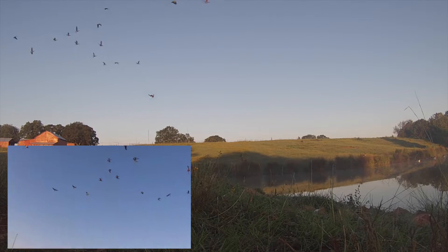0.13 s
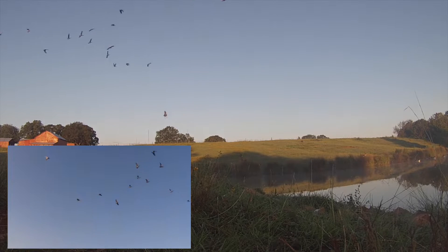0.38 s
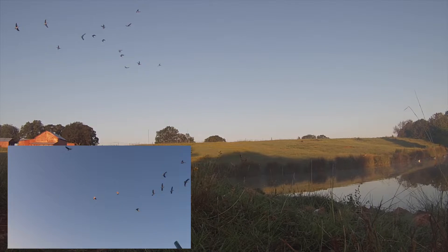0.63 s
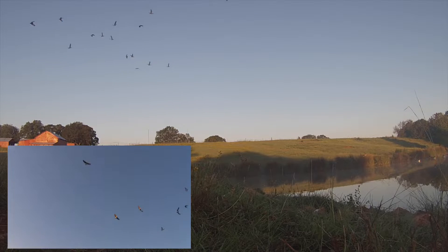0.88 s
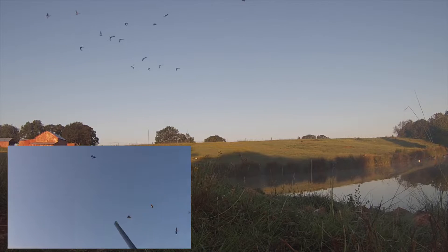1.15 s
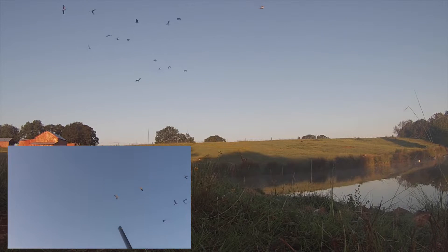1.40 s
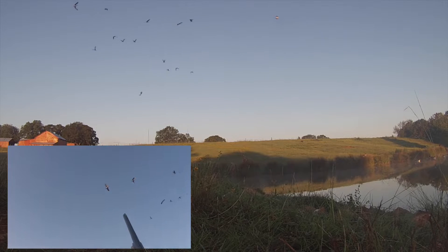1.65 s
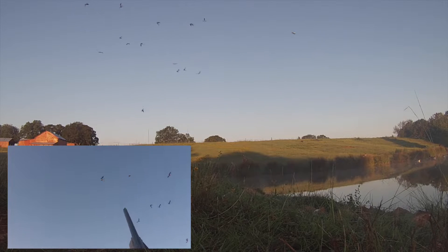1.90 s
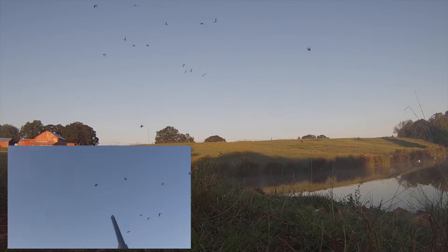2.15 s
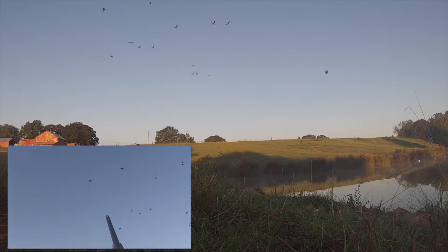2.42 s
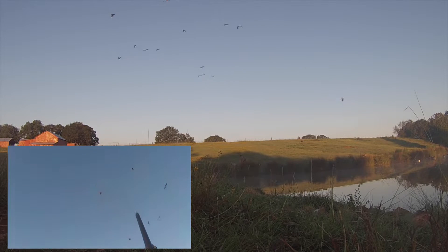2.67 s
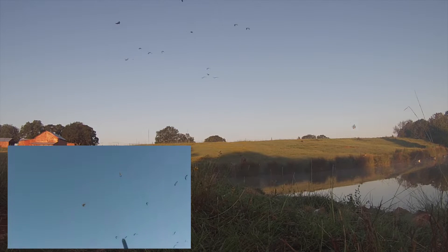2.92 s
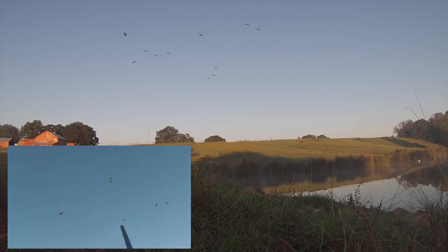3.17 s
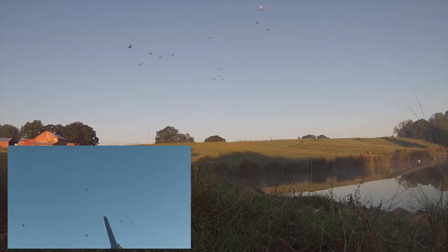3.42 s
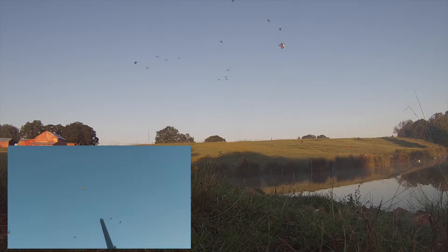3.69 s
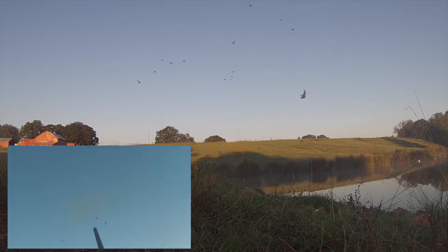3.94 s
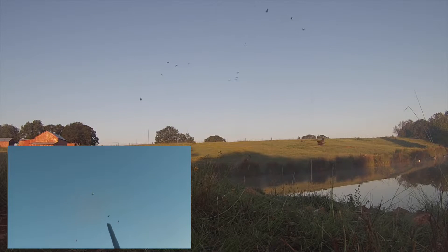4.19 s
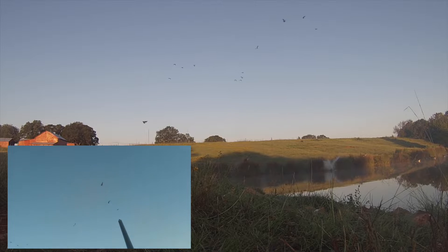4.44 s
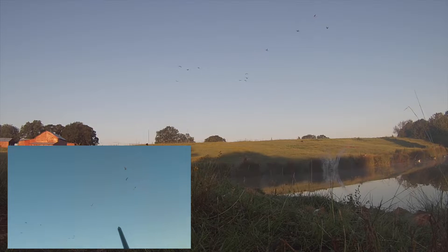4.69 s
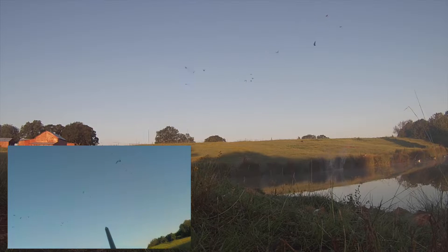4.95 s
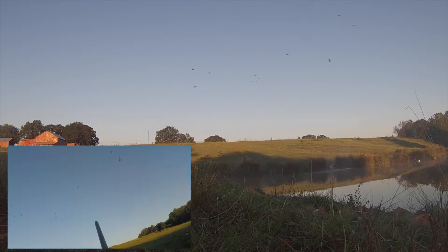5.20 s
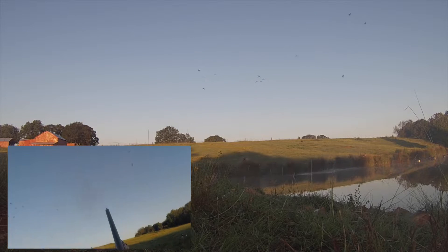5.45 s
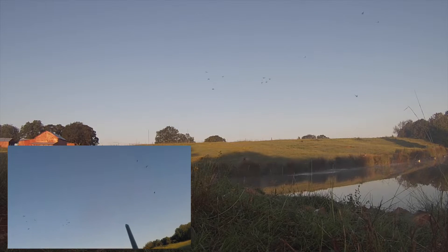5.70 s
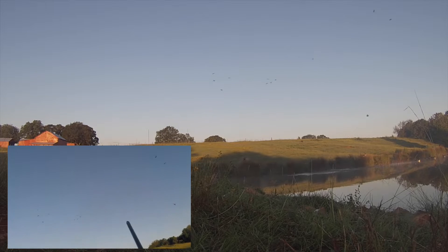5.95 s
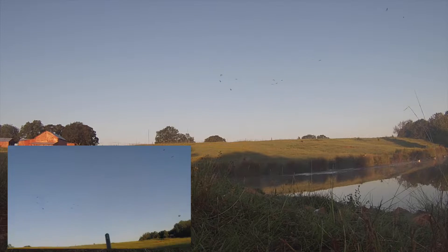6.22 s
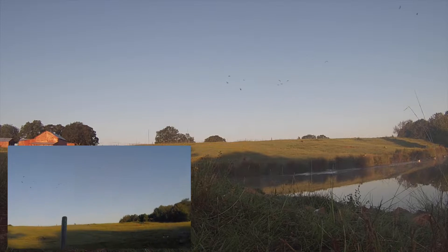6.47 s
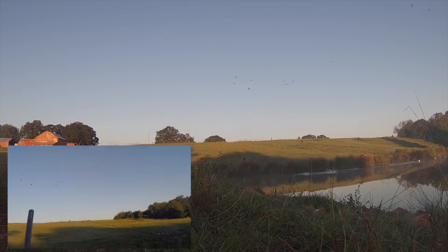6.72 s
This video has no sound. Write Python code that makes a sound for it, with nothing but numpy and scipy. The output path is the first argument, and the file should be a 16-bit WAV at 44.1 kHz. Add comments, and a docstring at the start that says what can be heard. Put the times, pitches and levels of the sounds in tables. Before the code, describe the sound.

A small sealed microphone worn by a shooter at an open pond picks up soft humming knocks, low body rumble, faint hiss and blurred distant geese. After a clack at 0.24 s, two loud blasts hit at 0.34 and 0.5, a weaker one at 0.68, another at 1.06, then 1.75 and an almost doubled pair near 2.05. Each is a clipped, boxy noise burst ringing the case, with a short field echo. A close shot at 2.58 brings a heavy jolt, then bright clacks and sliding action until 3.15. More blasts come at 3.3, 3.7 and 3.83. Gun parts rattle sharply around 4.3-4.55 with thin steel ringing. Scattered nasal honks begin near 3.6, clearer at 5.0. The last shot slams at 5.38 with a deep thump. Hiss and small ticks remain, and two strong honks close at 6.56 and 6.76.

```python
"""Shooters fire at geese over a pond, heard by a small sealed camera worn by one of them.
Soft knocks on the camera's springy mount and clacks of gun parts come first, over rumble and a steady
field hiss with a faint far flock. Then a ragged volley of noise bursts rings the case and overloads
the input, with field echoes and low jolts; between the shots actions slide, tick and ring.
Later a few near geese honk as gliding stacks of harmonics, and go on after the last shot."""
import sys
import numpy as np
from scipy import signal
from scipy.fft import rfft, irfft, next_fast_len
from scipy.io import wavfile
from scipy.ndimage import uniform_filter1d

SR = 44100
rng = np.random.default_rng(int(sys.argv[2]) if len(sys.argv) > 2 else 0)


def materialize(psi):
    """Save the field psi as 16-bit PCM at rate SR to the path in sys.argv[1].

    A 1-D psi becomes a single channel; in a 2-D psi each row is a channel.
    """
    bounded = np.clip(np.atleast_2d(psi).T, -1, 1)
    quanta = np.round(bounded * 32767).astype(np.int16)
    wavfile.write(sys.argv[1], SR, quanta)


def gain_from_db(level_db):
    """Convert decibel levels to linear amplitude factors (20 dB per decade)."""
    decades = np.asarray(level_db, float) / 20
    return 10 ** decades


N = 302082  # length in samples

# gunshots: time_s, level_db, ring_hz, bass_db, treble_db, field echo_db (next to the blast)
GUNSHOTS = [(0.337, 2.5, 2310, -3, -3, -5), (0.494, 3, 1766, -3, -8.5, -11),
            (0.681, -12, 2557, -5, -7.5, -5), (1.06, -1, 1900, -4, -3.5, -7),
            (1.75, -3, 2620, -2, -4.5, -0.5), (2.037, -1.5, 2034, 5, -7, -16),
            (2.07, -1.5, 2393, -1, 2, -10), (2.58, 1.5, 2070, -11, -1, -12),
            (3.29, 2.5, 1594, -5, -1, -9.5), (3.708, -6, 2490, -3, 0, -1.5),
            (3.832, -0.5, 2330, -16, 1, -14.5), (5.377, 3, 2176, -2, 1, -7)]
# loudness of the field over time: time_s, hiss_db
FIELD_LEVEL = [(0.0, -56.5), (0.42, -63), (0.72, -62.5), (1.6, -64), (1.93, -56), (2.29, -66.5),
               (2.94, -61), (3.64, -66), (3.83, -66), (4.92, -64.5), (5.34, -62), (5.63, -72), (5.8, -67.5),
               (6.4, -65), (6.85, -57.5)]


def shape(points, hz):
    """Gain at the given frequencies, read from a tone curve of (Hz, dB) points."""
    point_hz, point_db = np.transpose(points)
    return gain_from_db(np.interp(np.log(np.maximum(hz, 1)), np.log(point_hz), point_db))


def peak(hz, centre_hz, width_hz, db):
    """Power of one resonance: strongest at its centre, halved half a width away."""
    return gain_from_db(db) ** 2 / (1 + (2 * (hz - centre_hz) / width_hz) ** 2)


def case(x, bass_db=0., treble_db=0., ring=(2000, 200, -40)):
    """The sealed case dulls sound through its wall and rings at its cavity modes; tilted per source."""
    # sound through the case wall: pitch_hz, level_db
    wall = [(100, -15), (400, -11.5), (800, -12), (2000, -8), (3100, -21), (5300, -14.5), (9000, -20),
            (13000, -29.5), (15500, -42.5)]
    # resonances of the air inside: centre_hz, width_hz, level_db
    modes = [(447, 35, 0.5), (1188, 120, -5.5), (1548, 110, 2.5), (2040, 450, 1.5), (2580, 220, 3),
             (3550, 300, -10), (4115, 580, -3.5)]
    size = 4096  # samples
    hz = np.arange(size // 2 + 1) * SR / size
    power = shape(wall, hz) ** 2 + sum(peak(hz, *mode) for mode in modes) + peak(hz, *ring)
    tilt = [(600, bass_db), (1000, 0), (2700, 0), (4300, 0.64 * treble_db), (6500, treble_db)]
    gain = np.sqrt(power) * shape(tilt, hz)
    # folding the cepstrum gives a response that starts at once, with nothing before the sound
    cepstrum = irfft(np.log(gain))
    cepstrum[1:size // 2] *= 2
    cepstrum[size // 2 + 1:] = 0
    response = irfft(np.exp(rfft(cepstrum)))[:size // 2]
    response = response / np.sqrt(np.sum(response ** 2))  # power gain 1 for white noise
    return signal.fftconvolve(x, response)[:len(x)]


def add(out, start_s, x):
    """Mix x into out from a given time."""
    i = int(start_s * SR)
    out[i:i + len(x)] += x[:N - i]


def curve(table, column):
    """One table column drawn as a line through every sample."""
    rows = np.array(table)
    return np.interp(np.arange(N) / SR, rows[:, 0], rows[:, column])


def walk(rate_hz):
    """Slow random wander: levels held for one step of the rate, then smoothed twice."""
    k = int(SR / rate_hz)
    steps = np.repeat(rng.standard_normal(N // k + 1), k)
    return uniform_filter1d(uniform_filter1d(steps, k), k)[:N]


def unit(x):
    """Scale to an rms level of 1."""
    return x / np.sqrt(np.mean(x ** 2))


def shots():
    """A few ms of blast and ground bounce shake the case; patchy echoes roll back from the field."""
    # two stages of echo decay: t60_s (time to fall 60 dB), level_db
    echo_stages = [(0.051, -0.5), (.22, -20.5)]
    burst_ms = 4.8  # the burst has halved by then
    echo_bass_db, echo_treble_db = 11, 4  # above the blast's
    out, t = np.zeros(N), np.arange(int(.5 * SR)) / SR
    for time_s, db, ring_hz, bass_db, treble_db, echo_db in GUNSHOTS:
        burst = np.minimum(t / 0.0005, 1) / (1 + (1000 * t / burst_ms) ** 2.6)
        blast = case(burst * rng.standard_normal(len(t)), bass_db, treble_db, ring=(ring_hz, 250, 11))
        patches = np.repeat(rng.standard_normal(len(t) // 350 + 1), 350)[:len(t)]
        patchy = gain_from_db(3 * uniform_filter1d(patches, 100))
        fade = sum(gain_from_db(stage_db - 60 * t / t60_s) for t60_s, stage_db in echo_stages)
        fade = fade * np.minimum(t / 0.0018, 1)
        echo = case(patchy * fade * rng.standard_normal(len(t)),
                    bass_db + echo_bass_db, treble_db + echo_treble_db, ring=(1870, 60, 8))
        add(out, time_s + .0006, gain_from_db(db) * (blast + gain_from_db(echo_db) * echo))
    return out


def rattle(t, t60_s):
    """One short burst of contact noise with a faint tail."""
    fade = gain_from_db(-60 * t / t60_s) + gain_from_db(-34 - 60 * t / .14)
    return np.minimum(t / 0.0022, 1) * fade * rng.standard_normal(len(t))


def clacks():
    """Short rattles of metal and plastic, each ringing the case."""
    # gun actions, ejected shells and bumps on the camera: time_s, level_db, treble_db
    contacts = [(0.075, -39, -21), (0.1, -36.5, -41), (0.242, -24.5, -26), (0.444, -39, 7), (0.615, -50, 8),
                (0.779, -48, -30), (0.888, -46.5, -12), (1.242, -43, -6), (1.273, -42, -23),
                (1.376, -41.5, -27), (1.581, -44.5, -34), (1.645, -37.5, -36), (1.872, -36, 0),
                (1.978, -33, -17), (2.274, -48, -25), (2.337, -41, -19), (2.386, -39, -41),
                (2.63, -25.5, -7), (2.681, -30, -17), (2.703, -25.5, -18), (2.817, -43.5, 8),
                (2.872, -41, 20), (2.938, -22, 10), (2.969, -32.5, 5), (3.071, -40, 3), (3.119, -32, 5),
                (3.142, -23, 5), (3.888, -27, -16), (3.961, -33.5, -29), (4.004, -38.5, -15),
                (4.067, -50, -4), (4.308, -20.5, 7), (4.344, -34.5, 2), (4.451, -40.5, -4), (4.474, -36, 5),
                (4.533, -19.5, 5), (4.679, -44, -12), (4.832, -49.5, -28), (5.189, -49.5, -10),
                (5.356, -32.5, -23), (5.428, -32.5, -18), (5.492, -42, -14), (5.518, -31.5, -15),
                (6.013, -37.5, -19), (6.159, -36, 0), (6.298, -36, -20)]
    # harder contacts carry less bass: treble_db, bass_db
    bass_for_treble = [(-25, 7), (-8, 2), (8, -28)]
    # row numbers of the wearer's own gunshots, whose hammer is heard first
    own_shots = (7, 10, 11)
    hammer_lead_s, hammer_db, hammer_treble_db = .004, -26, 10
    out, t = np.zeros(N), np.arange(int(.2 * SR)) / SR
    hammers = [(GUNSHOTS[k][0] - hammer_lead_s, hammer_db, hammer_treble_db) for k in own_shots]
    for time_s, db, treble_db in hammers + list(contacts):
        bass_db = np.interp(treble_db, *np.transpose(bass_for_treble))
        t60_s = .052 - .0004 * treble_db  # harder contacts die faster
        add(out, time_s - .0007, gain_from_db(db) * case(rattle(t, t60_s), bass_db, treble_db))
    return out


def actions():
    """Parts tick against each other, harder as an action gathers speed; steel rings on thinly."""
    # the action sliding and rattling: start_s, end_s, level_db of the softest possible first tick
    slides = [(2.868, 2.988, -54.5), (3.023, 3.148, -54), (4.252, 4.348, -52), (4.42, 4.529, -49),
              (6.058, 6.2, -62.5)]
    # steel parts ringing until a hand or a part damps them: start_s, length_s, pitch_hz, level_db
    steel_rings = [(1.078, .11, 9030, -57.5), (1.13, 0.12, 8380, -62.5), (2.88, 0.028, 11900, -66),
                   (3.142, 0.062, 6260, -74.5), (4.537, 0.15, 6300, -66)]
    ticks = 26  # in one slide
    out, t = np.zeros(N), np.arange(int(.1 * SR)) / SR
    for start_s, end_s, db in slides:
        for k, (place, size, colour) in enumerate(rng.random((ticks, 3))):
            tick = case(rattle(t, 0.028), -2.5, 14 * colour, ring=(2000 * 4 ** colour, 500, -6))
            tick_s = start_s + (k + place) * (end_s - start_s) / ticks
            add(out, tick_s, gain_from_db(db + 7 * k / ticks + 13 * size ** 3) * tick)
    for start_s, length_s, pitch_hz, db in steel_rings:
        t = np.arange(int(length_s * SR)) / SR
        fade = gain_from_db(db - 90 * t) * signal.windows.tukey(len(t), .2)
        wavering_hz = pitch_hz + 25 * walk(60)[:len(t)]
        add(out, start_s, fade * np.sin(2 * np.pi * np.cumsum(wavering_hz) / SR))
    return out


def jolts():
    """Blasts and recoil push the membrane out and back: a hump, a longer rebound, then perhaps a sway."""
    # pushes: time_s, level_db, push_ms (centre of the hump to 1/e), direction (+1 or -1)
    pushes = [(0.342, -5, 2.3, 1), (0.497, -2, 1.4, -1), (1.752, -20, 1.3, 1), (2.077, -12, 0.87, -1),
              (2.611, -8.5, 3.55, 1), (3.296, -11.5, 1.5, -1), (3.867, -7, 2.97, 1), (4.359, -22, 5.2, 1),
              (5.408, -2, 3.17, 1)]
    sway_hz, sway_db, sway_t60_s = 42, -15, .42  # the head rocks on after a slow jolt
    out, t = np.zeros(N), np.arange(N) / SR
    for time_s, db, push_ms, direction in pushes:
        u = 1000 * (t - time_s) / push_ms
        hump = np.exp(-u ** 2)
        hump -= .55 * np.exp(-((u - 2.7) / 1.6) ** 2)  # the rebound
        hump -= .3 * np.exp(-((u + 2.6) / 1.4) ** 2)  # a shallow dip ahead of it
        after = (t - time_s - .02).clip(0)
        sway = gain_from_db(sway_db - 60 * after / sway_t60_s) * np.sin(2 * np.pi * sway_hz * after)
        out += np.sign(direction) * gain_from_db(db) * (hump + (push_ms > 2) * sway)
    return out


def noise_band(low_hz, high_hz, order):
    """Noise between two frequencies, at rms 1."""
    sos = signal.butter(order, [low_hz, high_hz], "bandpass", fs=SR, output="sos")
    return unit(signal.sosfilt(sos, rng.standard_normal(N)))


def mount():
    """Each soft knock rings the springy mount; body motion rumbles below it."""
    # the stronger knocks: time_s, strength_db
    strong_knocks = [(0.009, -28), (0.093, -17.5), (0.209, -21.5), (0.259, -21), (0.428, -27),
                     (0.518, -23.5), (0.676, -31.5), (0.896, -31), (1.04, -32.5), (1.149, -34.5),
                     (1.64, -32), (1.748, -23), (1.852, -23.5), (1.93, -26), (2.075, -25), (2.347, -27),
                     (2.618, -12), (2.708, -14), (2.995, -37), (3.153, -33), (3.309, -24.5), (3.889, -20.5),
                     (3.997, -20), (4.352, -35), (4.66, -29.5), (4.842, -34.5), (5.423, -7), (5.499, -14.5),
                     (6.292, -25)]
    # hums of the mount: pitch_hz, level_db, t60_s (time to fall 60 dB)
    hums = [(122.8, 1, 0.24), (229.4, -24, .3)]
    # body rumble: time_s, level_db
    rumble = [(0.0, -35), (0.36, -30), (0.57, -45), (1.72, -43), (1.87, -37), (2.19, -47), (2.63, -44),
              (3.26, -50), (3.39, -55), (3.72, -55), (3.91, -42), (4.08, -52), (4.33, -52), (4.5, -40),
              (5.06, -48), (5.44, -42), (5.87, -50), (6.85, -38)]
    nudges, nudge_db, nudge_spread_db = 30, -48, 9  # faint knocks at random moments
    shiver_db = -18  # the rumble shakes the mount faintly all the time
    push = np.zeros(N)
    faint_knocks = [(place * N / SR, nudge_db + nudge_spread_db * size)
                    for place, size in rng.random((nudges, 2))]
    for time_s, db in list(strong_knocks) + faint_knocks:
        u = np.linspace(0, 1, int(0.06 * rng.uniform(.76, 1.3) * SR))
        swell = np.sin(np.pi * np.sqrt(u)) ** 2  # quick to rise, slow to let go
        add(push, time_s, gain_from_db(db) * swell * rng.standard_normal(len(u)) / np.sqrt(len(u)))
    t = np.arange(SR) / SR
    hum = 0
    for hz, db, t60_s in hums:
        # a knock lasts a few cycles, so the ringing swells before it dies
        drive = np.sqrt(signal.fftconvolve(push ** 2, gain_from_db(-120 * t / t60_s))[:N].clip(0))
        tone = np.sin(2 * np.pi * np.cumsum(hz * (1 + .03 * walk(25))) / SR)
        ringing = gain_from_db(3 * walk(40)) * tone + .3 * noise_band(.8 * hz, 1.15 * hz, order=4)
        hum = hum + gain_from_db(db) * uniform_filter1d(drive, 400) * ringing
    shaking = noise_band(18, 44, order=2) + gain_from_db(shiver_db) * noise_band(108, 136, order=3)
    return hum + gain_from_db(curve(rumble, 1)) * shaking


def honk(length_s, first_hz, top_hz, db, scale, hoarse):
    """Harmonics gliding through the throat colour, pitch and level trembling."""
    # throat resonances and gaps: pitch_hz, level_db
    throat = [(500, -9), (800, -22), (1150, 3), (1620, 0), (1760, -7), (2400, -12), (3200, -23),
              (4050, -11), (4900, -30), (6500, -27), (8000, -37)]
    sag = .07  # high notes sag by this share after the top
    swell_db, fade_db = -7, -13
    t = np.arange(0, length_s, 1 / SR)
    low = top_hz < 650  # low notes climb to their end
    at = length_s * np.array([0, .95 if low else .5, .97 if low else .8, 1])
    pitch_hz = [first_hz, top_hz, top_hz * (1 - sag / 5), top_hz * (1 - sag * (not low))]
    level_db = db + np.array([swell_db * (1 + low), 0, fade_db / 3, fade_db * (not low)])
    hz, db = (uniform_filter1d(np.interp(t, at, line), 1200) for line in (pitch_hz, level_db))
    wobble = uniform_filter1d(rng.standard_normal((2, SR // 3)), 300, axis=1)[:, :len(t)]
    phase = 2 * np.pi * np.cumsum(hz * (1 + hoarse * wobble[0])) / SR
    k = np.arange(1, 11)[:, None]  # harmonic numbers
    voice = np.sum(shape(throat, k * hz / scale) * np.sin(k * phase + k ** 2), axis=0)
    return gain_from_db(db + 25 * wobble[1]) * signal.windows.tukey(len(t), .25) * voice


def geese():
    """Near geese honk clearly; the far flock gabbles faint and smeared, swelling with the field."""
    # near calls: start_s, length_s, first_hz, top_hz, level_db, scale (of the throat resonances);
    # two geese break from a low note into the high one
    near_calls = [(3.57, .11, 775, 772, -62, 1), (4.19, .09, 750, 790, -61, 1),
                  (4.82, .16, 505, 590, -66, 1), (4.975, .155, 788, 815, -52, 1),
                  (5.28, .12, 690, 712, -59, 1), (5.74, .08, 765, 785, -63, 1),
                  (6.39, .185, 525, 592, -57, 1), (6.56, .17, 790, 815, -44, 1),
                  (6.66, .2, 705, 710, -63, 1.85), (6.76, .2, 745, 812, -46, 1)]
    flock_db = -5  # far calls next to the hiss
    near, far = np.zeros(N), np.zeros(N)
    for start_s, *call in near_calls:
        hoarse = .03 * call[-1] ** 4  # birds with higher throat resonances are hoarser
        add(near, start_s, honk(*call, hoarse=hoarse))
    for place, note, glide, size in rng.random((80, 4)):
        hz = 690 * 1.35 ** note
        call = honk(.12, hz, hz * (1 + .07 * glide), 10 * size, 1 + .3 * note, hoarse=.4)
        add(far, place * N / SR, call)
    t = np.arange(SR // 5) / SR
    blur = rng.standard_normal(len(t)) * gain_from_db(-60 * t / 0.28)  # banks and water blur far calls
    far = signal.fftconvolve(far, blur)[:N]
    return near + gain_from_db(curve(FIELD_LEVEL, 1) + flock_db) * unit(far)


def field():
    """Air, grass and the far flock as hiss through the case; quarter-octave bands flicker apart."""
    # tone of the hiss: pitch_hz, level_db
    tilt = [(150, -8), (300, -5.5), (700, -1), (2000, -3.5), (5000, -4.5), (13600, -8), (14300, 9.5),
            (14900, -5)]
    size = next_fast_len(N)
    hiss = rfft(case(rng.standard_normal(size)))
    hz = np.arange(len(hiss)) * SR / size
    hiss *= shape(tilt, hz) * (hz > 150)
    total = np.zeros(N)
    for low_hz in 150 * 2 ** np.arange(0, 7, .25):
        inside = (hz >= low_hz) & (hz < 2 ** .25 * low_hz)
        total += irfft(hiss * inside, size)[:N] * gain_from_db(3 * walk(9))
    return gain_from_db(curve(FIELD_LEVEL, 1)) * unit(total)


def scene():
    """Everything reaches one microphone."""
    return (shots() + clacks() + actions() + jolts() + mount() + geese() + field())[None]


def band_limit(x):
    """A steep low-pass at the top of the band."""
    return signal.sosfilt(signal.butter(12, 16230, fs=SR, output="sos"), x)


def record(dry):
    """The input stage bends peaks near full scale back down, then a steep filter cuts the top."""
    clipped = dry / (1 + np.abs(dry / .95) ** 13.0) ** (1 / 7.8)
    top_cut = signal.ellip(8, .2, 60, 15300, fs=SR, output="sos")  # low-pass at 15300 Hz
    mix = signal.sosfilt(top_cut, clipped)
    return band_limit(mix)


dry = scene()
out = record(dry)
materialize(out)
```